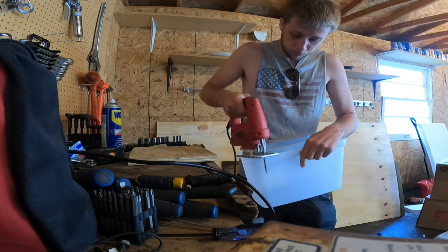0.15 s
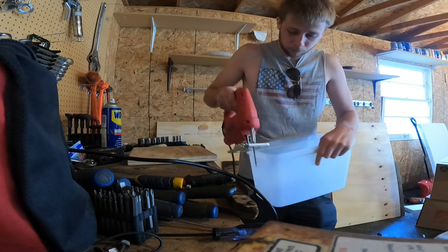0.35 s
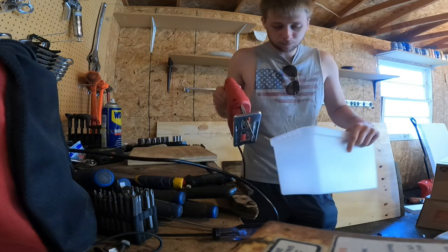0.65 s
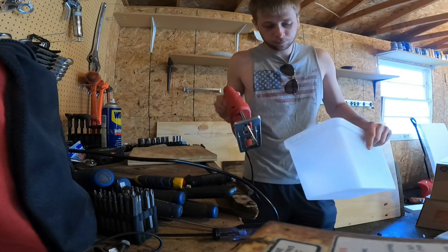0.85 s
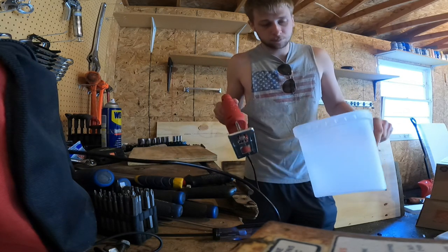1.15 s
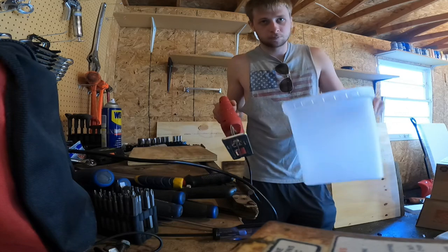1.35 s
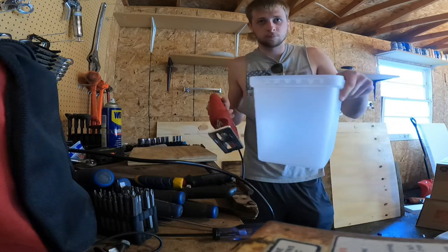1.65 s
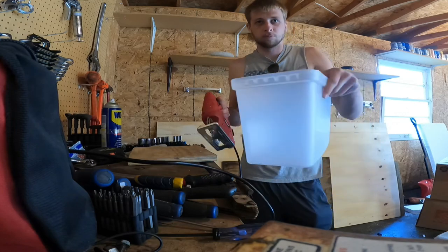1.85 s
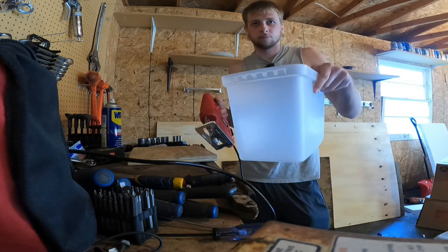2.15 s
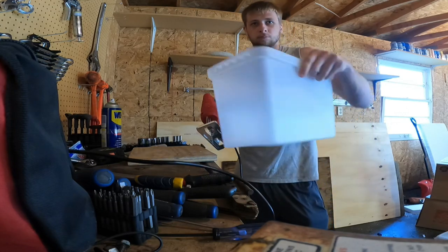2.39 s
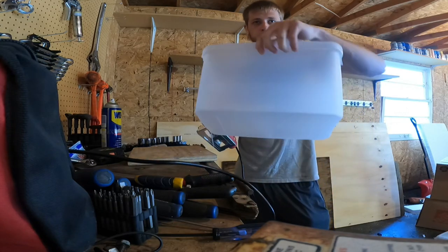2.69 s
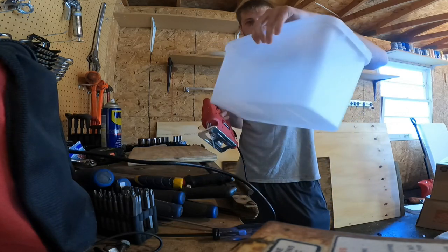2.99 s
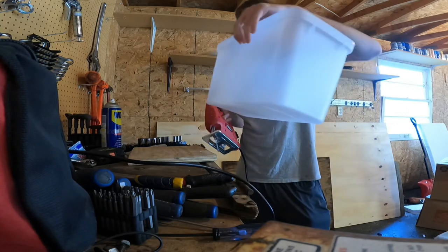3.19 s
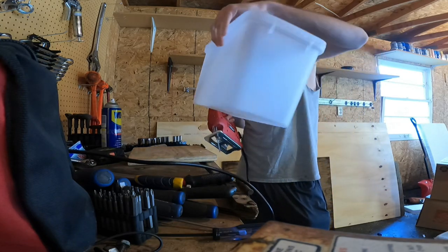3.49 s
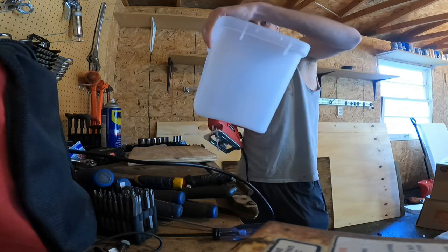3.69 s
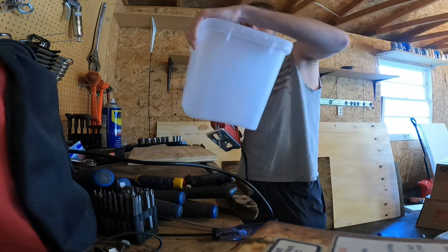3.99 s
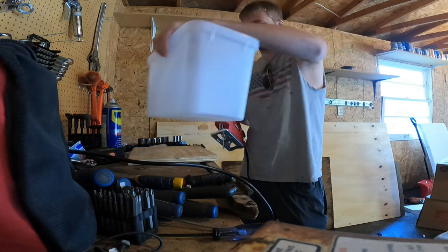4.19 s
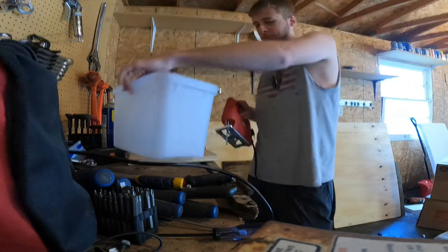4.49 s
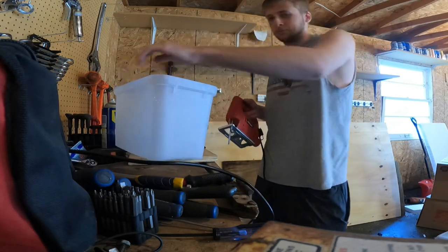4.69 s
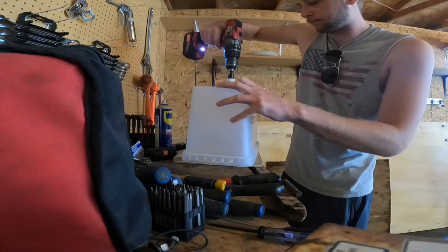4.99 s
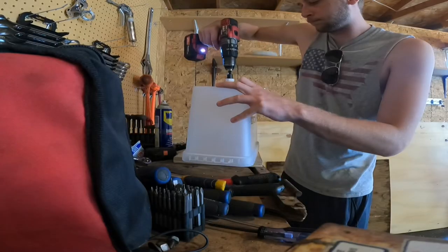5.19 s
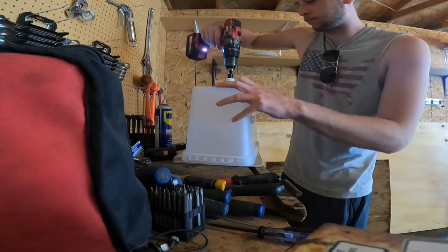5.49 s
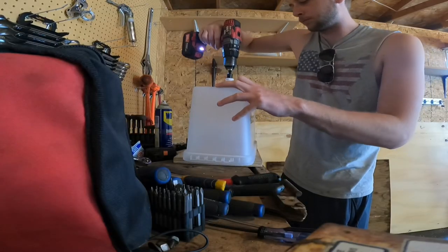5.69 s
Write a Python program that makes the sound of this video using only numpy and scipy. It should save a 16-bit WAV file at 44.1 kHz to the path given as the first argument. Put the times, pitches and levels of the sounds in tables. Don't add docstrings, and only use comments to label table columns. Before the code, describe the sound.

In a wooden shed, a power saw coasts down, clattering; a hollow plastic tub is handled and banged down, then a drill chirps briefly.

```python
import sys
import numpy as np
from scipy import signal
from scipy.fft import rfft, irfft, next_fast_len
from scipy.io import wavfile

SR = 44100
rng = np.random.default_rng(int(sys.argv[2]) if len(sys.argv) > 2 else 0)


def log_audio(samples):
    frames = np.atleast_2d(samples).T
    limited = np.clip(frames, -1, 1)
    pcm = np.round(limited * 32767).astype(np.int16)
    wavfile.write(sys.argv[1], SR, pcm)


def ratio_of_db(decibels):
    return 10 ** (np.asarray(decibels, float) / 20)


N = 257984
T = np.arange(N) / SR
STOP_S = 2.109
CHANGE_S = (4.733, 4.773)

# (frequency [Hz], level per Hz [dB])
RATTLE_FAST = [(120, -68.5), (200, -21), (227, -36), (302, -15), (607, -12), (782, -5.5), (851, -7.5),
               (926, -2.5), (1230, -4.5), (1590, -3.5), (2070, -10), (2500, -16.5), (3250, -22.5),
               (5500, -120)]
RATTLE_SLOW = [(120, -54.5), (200, -32), (322, -27), (361, -17), (402, -13), (442, -12.5), (816, -11),
               (966, -5), (1100, -6.5), (1430, 4), (2050, -7), (2500, -12), (3250, -38), (5500, -120)]
# (frequency [Hz], level per Hz [dB])
HISS_FAST = [(1240, -25.5), (2100, -8), (2660, -9), (2990, -2.5), (3700, -5), (4570, -4), (6110, -9),
             (7620, -13), (10900, -22), (12100, -20.5), (13700, -34.5)]
HISS_SLOW = [(1240, -43), (2100, -22.5), (2200, -14.5), (2760, 1.5), (2990, 3), (4030, 1), (4750, 0.5),
             (6720, -2.5), (7620, -6), (13700, -18)]
# (frequency [Hz], width [Hz], level fast [dB], level slow [dB])
PANELS = [(1557, 150, -22.5, -13), (4450, 360, -10.5, -24), (974, 170, -13.5, -13), (1290, 270, -6, -21.5)]
# (multiple of the whine [1], level [dB])
WHINE_OVERTONES = [(1, 0), (2, -8.5), (3, -8), (4, -14), (5, -8), (6, -15), (8, -18)]
# (frequency [Hz], width [Hz], level [dB])
HOUSING = [(4780, 330, 5.5), (4300, 220, -1), (5650, 130, 2), (8500, 200, -2), (7550, 600, -3),
           (6600, 700, -10), (2900, 400, -8)]
SHAFT_ORDERS = [1, 2, 3, 5, 7.5, 12.5, 15, 17.5, 20, 22.5]
SHAFT_LEVELS = [-40, -35, -34, -31, -36, -32, -32, -34, -34, -34]
# (first knock [s], number of knocks [1])
SLACK = [
    (.7541, 13),
    (1.0932, 6),
    (1.5449, 2),
    (1.4640, 3),
    (.768, 6),
]
# (peak level [dB], frequency [Hz], top edge level [dB])
SLACK_SOUND = [(-7, 3100, -17), (-12, 4500, -5), (-13, 4400, -11), (-14, 3800, -12), (-15.5, 4200, -9)]
# (time [s], peak level [dB], frequency [Hz], top edge level [dB])
STRAYS = [(0.089, -24.5, 3850, -6), (.198, -10.5, 4450, -13), (.292, -11, 4340, -6), (.341, -8, 4170, -10),
          (.367, -10, 4300, -9), (.474, -13, 3500, -9), (.495, -14.5, 4000, -6.5), (.4185, -9, 4270, -8),
          (.532, -12.5, 4680, -5.5), (.593, -12, 2830, -13), (0.627, -8.5, 2910, -5),
          (.6605, -11, 2690, -9.5), (.717, -13.5, 3470, -11.5), (.73, -12, 2900, -16.5),
          (.946, -19.5, 4150, -11), (1.308, -21, 2950, -10.5), (1.3215, -12, 3080, -11),
          (1.271, -14.5, 4000, -7.5), (1.5625, -16, 3000, -9), (1.4355, -13.5, 2970, -22),
          (1.453, -17, 3530, -8.5), (1.5243, -31, 3490, -9), (1.601, -19, 3010, -7),
          (1.6305, -12.5, 3580, -26), (1.6935, -15, 3000, -6), (1.727, -20, 5160, -1),
          (1.7995, -18, 3500, -2), (1.836, -34, 2900, -16), (1.854, -20, 2900, -4),
          (1.8955, -17.5, 3734, -6), (2.047, -48, 3750, -5), (2.0705, -29.5, 3500, 3),
          (2.1415, -44, 2620, -5)]
# (time [s], wall level [dB], wall frequency [Hz])
SNAGS = [(0, 0.5, 329), (.02, -.5, 355), (0.039, -10, 370), (.07, -2.5, 383), (.092, 1.5, 321),
         (0.129, -11.5, 295), (0.199, -19, 308), (.225, -17.5, 323), (.265, -23, 400), (.305, -24, 443),
         (0.361, -28, 322)]
# (start [s], level [dB], length [s], rise [s])
JOLTS = [
    (0, -3, .09, 0.038),
    (0.094, -4.5, .08, 0.006),
]
# (time [s], air level [dB], air frequency [Hz], wall level [dB], wall frequency [Hz])
THUMPS = [(2.531, -34, 110, -33, 351), (2.592, -32.5, 110.7, -28.5, 357), (2.694, -1.5, 87, -6, 396),
          (2.701, -5.5, 130.3, -8, 186.6), (2.745, -25.5, 120, -29.5, 409), (4.5145, -7, 118, -0.5, 265),
          (4.515, 0, 197.6, -8, 575.5), (4.514, -24.5, 160, -14, 1060), (4.528, -10.5, 61, -6.5, 388.4),
          (4.56, -3, 122.2, -10, 328), (4.604, -8.5, 116.6, -14, 395), (4.651, -14, 111.8, -22.5, 302),
          (4.987, -10.5, 143.5, -20.5, 225), (5.02, -23.5, 200, -12.5, 295.7),
          (5.045, -18, 59.9, -17.5, 311.8), (5.082, -19, 41.2, -23, 104.5), (5.148, -19, 35.95, -29, 118.5),
          (5.36, -21.5, 99.5, -26, 273), (5.391, -33, 199.3, -22.5, 253), (5.419, -34.5, 188, -25.5, 293.3),
          (5.816, -7, 150, -11.5, 226.6)]
# (time [s], peak level [dB], frequency [Hz], edge level [dB], time to fall 60 dB [s])
CRACKS = [(2.6925, -12, 1245, -3, 0.15), (2.6945, -10, 1530, -20, 0.033), (2.704, -21, 1580, -10.5, 0.051),
          (4.29, -43, 1720, -6, 0.062), (4.5128, 3.5, 1102, -28.5, 0.14), (4.541, -23, 1010, -11.5, 1),
          (4.576, -20, 1150, -20, 0.55), (4.605, -20, 910, -34.5, 0.17), (4.631, -21.5, 1030, -28, 0.27),
          (4.656, -33, 1065, -29, 0.22), (4.982, -20.5, 940, -6, 0.36), (5.017, -33, 1060, 2, 0.22),
          (5.037, -13.5, 1820, -15.5, 0.023), (5.48, -34.5, 1830, -12, .1),
          (5.484, -20.5, 1830, -19.5, 0.13), (5.486, -35, 960, -6, 0.099), (5.815, -27.5, 1480, -18, 0.19),
          (5.821, -14.5, 1820, -27, 0.47)]
# (frequency [Hz], level per Hz [dB])
CRACK_BODY = [(240, -42.5), (400, 4), (433, -8.5), (554, -6), (674, -6), (719, -9), (819, -16.5),
              (1040, 1.5), (1120, -9.5), (1550, -7.5), (2820, -23.5), (9000, -74.5), (11700, -77),
              (19800, -120)]
# (frequency [Hz], level per Hz [dB])
BRIGHT_EDGE = [(1500, -28.5), (2800, 1.5), (5000, -4), (8000, -13), (11000, -22.5), (14000, -28.5)]
# (time [s], level [dB], time to fall 60 dB [s])
SHUDDERS = [
    (2.696, -21.5, 0.23),
    (4.52, -12, 0.36),
    (4.6, -20.5, .4),
    (4.99, -23, 0.22),
    (.1, -21, .6),
]
# (frequency [Hz], level per Hz [dB])
BOARDS = [(40, -20), (70, -2), (130, 1.5), (270, -2), (400, -3.5), (480, -12.5), (1200, -29.5),
          (4000, -110)]
# (centre [s], half length [s], dull level [dB], bright level [dB])
SCUFFS = [(2.102, 0.057, -59.5, -53.5), (2.492, 0.051, -79, -57), (2.538, 0.022, -38.5, -47),
          (2.597, 0.023, -38, -57), (2.647, 0.1, -60, -59.5), (2.759, 0.048, -44, -52.5),
          (2.864, 0.057, -47.5, -57), (3.13, 0.061, -71, -70), (3.766, 0.045, -70.5, -75),
          (3.908, 0.074, -63, -88.5), (4.038, 0.068, -65, -75), (3.663, 0.049, -73, -93.5),
          (5.282, .03, -73, -76), (4.146, 0.033, -62, -64), (4.23, 0.016, -65, -67), (4.29, .014, -64, -56),
          (4.305, 0.074, -59.5, -58), (4.424, 0.1, -49, -49), (4.51, 0.0093, -29.5, -57),
          (4.976, 0.065, -48, -53), (5, 0.021, -32.5, -57), (5.053, 0.13, -54, -66.5),
          (5.395, 0.0037, -57, -60), (5.426, 0.01, -45.5, -68), (5.833, 0.016, -57, -59.5),
          (5.648, 0.26, -54.5, -63.5)]
# (frequency [Hz], level per Hz [dB])
RUB_DULL = [(260, -15.5), (450, -3), (478, -14), (564, -11), (621, -13.5), (1060, -9), (1500, -12.5),
            (1960, -16.5), (2560, -26.5), (2900, -28.5), (3600, -68), (4680, -98), (7920, -120)]
RUB_BRIGHT = [(1470, -12), (2500, -0.5), (3300, -5.5), (3900, -6.5), (5300, -5), (8340, -12), (12300, -21),
              (13700, -29.5)]
# (frequency [Hz], level per Hz [dB])
RUMBLE_COLOUR = [(8.8, -49), (15, -12), (48, 6), (76, 3), (134, 2), (162, -2.5), (273, -9), (314, -10.5),
                 (378, -14), (441, -20), (483, -34.5), (564, -31), (600, -38.5), (780, -65), (1320, -120)]
# (start [s], length [s], start frequency [Hz], end frequency [Hz], level [dB])
FAR_TONES = [(0.62, 0.19, 906, 895, -26.5), (.11, 0.2, 805, 800, -26), (1.425, 0.03, 1440, 1440, -24),
             (1.62, .04, 1420, 1400, -29), (1.91, .05, 1500, 1480, -36), (1.496, 0.039, 1560, 1550, -24),
             (1.75, 0.058, 1450, 1440, -30), (1.835, 0.05, 1480, 1490, -31), (1.528, .016, 7900, 7600, -35),
             (1.772, .024, 4560, 4440, -34), (2.85, 0.7, 128.2, 129.5, -37), (3.11, 0.57, 370, 372, -49.5),
             (4.202, 0.39, 214.8, 217.6, -39.5), (3.441, 0.12, 2860, 2850, -63),
             (3.75, 0.24, 2350, 2320, -62.5), (3.19, 0.11, 2360, 2410, -68), (3.85, .1, 3380, 3400, -69),
             (3.8, .12, 2750, 2800, -69), (4.937, .025, 8800, 8800, -52), (5.08, .18, 4700, 4600, -72),
             (5.51, 0.06, 6750, 7100, -69), (5.535, .045, 7300, 7500, -69), (5.615, .03, 7150, 7400, -67),
             (5.625, 0.055, 7800, 7950, -56), (5.665, .075, 7950, 7880, -63), (4.985, .04, 7100, 7000, -62),
             (4.975, .03, 6300, 6200, -58)]
# (frequency [Hz], time to fall 60 dB [s])
SHED_DECAY = [(100, 0.5), (500, 0.37), (2000, 0.24), (8000, 0.31)]
# (frequency [Hz], level [dB])
ROOM_SHARE = [(60, -20), (300, -3.5), (1000, -9.5), (8000, -15)]
# (frequency [Hz], likeness [0 to 1])
LIKENESS = [(30, 0.99), (110, 1), (200, 0.99), (360, 0.98), (660, 0.92), (1200, 0.96), (2200, 0.78),
            (4000, 0.92), (7290, 0.94), (13300, 0.75)]
# (frequency [Hz], level difference [dB])
TILT = [(60, .2), (150, .4), (360, 0.1), (890, -0.57), (2200, 0.23), (5400, -0.8), (13300, 0.0)]
# (frequency [Hz], level [dB])
MIC = [(8, -30), (25, -1), (40, 0), (7500, 0), (8200, -5), (9600, -3.5), (13100, -5), (13900, -16),
       (16000, -28)]


def evened(x):
    return x / np.sqrt(np.mean(x ** 2) + 1e-20)


def read(points, hz):
    f, value = np.transpose(points)
    return np.interp(np.log(hz + 1), np.log(f + 1), value)


def add(mix, s, sound):
    part = mix[round(s * SR):][:len(sound)]
    part += sound[:len(part)]


def colour(x, points):
    size = next_fast_len(N)
    gain = ratio_of_db(read(points, np.fft.rfftfreq(size, 1 / SR)))
    return evened(irfft(rfft(x, size) * gain, size)[:N])


def noise():
    return rng.standard_normal(N)


def drift(per_s):
    knots = rng.standard_normal(3000)
    return np.interp(T * per_s, np.arange(3000), knots) * 1.2


def grains(per_s, spread_db, hiss):
    sizes = ratio_of_db(spread_db * np.minimum(rng.exponential(1, N), 4))
    ticks = (rng.random(N) < per_s / SR) * sizes
    return evened(ticks * noise()) + hiss * noise()


def ring(hz, t60, rise=0.000044):
    t = np.arange(int(np.clip(1.5 * t60, .001, 1) * SR)) / SR
    return np.sin(2 * np.pi * hz * t) * ratio_of_db(-60 * t / t60) * (1 - np.exp(-t / rise))


def glide(hz):
    return np.sin(2 * np.pi * np.cumsum(hz) / SR)


def shed(x):
    length = SR // 2
    echoes = rng.random((2, length)) < .06
    taps = rng.choice([-1., 1.], (2, length)) * echoes * (np.arange(length) > 150)
    hz, t, z = signal.stft(taps, SR, nperseg=256)
    tail = signal.istft(z * ratio_of_db(-60 * t / read(SHED_DECAY, hz)[:, None]), SR, nperseg=256)[1]
    return signal.fftconvolve(x[None], tail / np.linalg.norm(tail[0]), axes=1)[:, :N]


def rumble():
    level_db, gust_db, gust_s = -35, 5, 5.45
    out = colour(noise(), RUMBLE_COLOUR) * ratio_of_db(level_db + 0.5 * drift(27))
    swell_db = np.interp(T, (1.2, 2.54), (-12, 0))
    swell_db = swell_db - 2.5 * (T > CHANGE_S[0])
    out *= ratio_of_db(swell_db + gust_db * np.exp(-((T - gust_s) / 0.12) ** 2))
    for s, length, start_hz, end_hz, db in FAR_TONES:
        hz = np.linspace(start_hz, end_hz, round(length * SR))
        hz = hz * (1 + 0.007 * drift(400)[:len(hz)])
        waver = ratio_of_db(db + 2.5 * drift(30)[:len(hz)]) * signal.windows.tukey(len(hz), .5)
        add(out, s, waver * glide(hz))
    return out


def handling():
    from_s, rise_s = 2.056, 0.044
    dull, bright = ratio_of_db(-52.5), ratio_of_db(-70)
    for s, half, dull_db, bright_db in SCUFFS:
        swell = np.exp(-((T - s) / half) ** 2)
        dull = dull + ratio_of_db(dull_db) * swell
        bright = bright + ratio_of_db(bright_db) * swell
    dull = dull * colour(grains(650, spread_db=-3.0, hiss=1.8), RUB_DULL) * ratio_of_db(0.93 * drift(30))
    bright = bright * colour(grains(660, spread_db=-4.5, hiss=2.3), RUB_BRIGHT) * ratio_of_db(0.93 * drift(40))
    return (dull + bright) * np.clip((T - from_s) / rise_s, 0, 1)


def bench():
    land_s, thud_db, thud_t60 = 4.5145, -2.5, 0.13
    start_hz, end_hz, sag_s = 339.6, 105, .011
    shake = 0
    for s, db, t60 in SHUDDERS:
        rise = np.clip((T - s) / 0.0038, 0, 1)
        shake = shake + ratio_of_db(db - 60 * np.maximum(T - s, 0) / t60) * rise
    out = shake * colour(noise(), BOARDS)
    t = np.arange(SR // 4) / SR
    hz = end_hz + (start_hz - end_hz) * np.exp(-t / sag_s)
    add(out, land_s, ratio_of_db(thud_db - 60 * t / thud_t60) * glide(hz))
    return out


def drill():
    start_s, off_s, end_s = 4.903, 5.0, 5.14
    pitch_hz, sag_hz = 4150, 40
    rise = np.clip((T - start_s) / (off_s - start_s), 0, 1)
    after = np.maximum(T - off_s, 0)
    hz = (pitch_hz - sag_hz * rise ** 2) * (1 + .022 * drift(600))
    on = np.clip((T - start_s) / 0.011, 0, 1) * (T < end_s)
    on = on * ratio_of_db(-12 * np.minimum(after / 0.011, 1))
    tone = ratio_of_db(-45.5 + 9 * rise ** 0.66 - 60 * after / .4 + 2 * drift(150)) * glide(hz)
    octave = ratio_of_db(-45.5 - 60 * after / 0.26 + 4.6 * drift(120)) * glide(2 * hz)
    return on * (tone + octave)


def wall(db, hz, t60):
    main = ring(hz, 0.5 * t60, 0.0022)
    lower = .5 * ring(hz * .84, 0.5 * t60, 0.001)
    upper = 0.13 * ring(hz * 1.17, 0.5 * t60, 0.0014)
    return ratio_of_db(db) * (main + lower + upper)


def bin_shake():
    air_hz, left_db, left_t60 = 119.1, -32, 1
    shake = ratio_of_db(left_db - 60 * (T - .19) / left_t60 + 1.8 * drift(33)) * (T > JOLTS[-1][0])
    for s, db, length, rise in JOLTS:
        head_start = 0.16 * (s == 0)
        fade = ratio_of_db(db - 24 * ((T - s) / length) ** 2)
        shake = shake + fade * np.clip((T - s) / rise + head_start, 0, 1)
    out = shake * glide(air_hz * (1 + 0.02 * drift(30)))
    for s, db, hz in SNAGS:
        add(out, s, wall(db, hz, t60=0.13))
    return out


def bin_cracks():
    out = np.zeros(N)
    body, edge = colour(noise(), CRACK_BODY), colour(noise(), BRIGHT_EDGE)
    t = np.arange(SR // 2) / SR
    for s, db, hz, edge_db, t60 in CRACKS:
        at = round(s * SR)
        fall = ratio_of_db(-60 * t / .025) + .35 * ratio_of_db(-60 * t / t60)
        shape = (fall * (1 - np.exp(-t / .0005)))[:N - at]
        add(out, s, ratio_of_db(db - 8.0) * shape * (body[at:][:len(t)] + ratio_of_db(edge_db) * edge[at:][:len(t)]))
        add(out, s, ratio_of_db(db - 5) * ring(hz, .03, .0004))
        add(out, s, ratio_of_db(1.4 * db - 14) * ring(4000, 0.0016, .00003))
    return out


def bin_knocks():
    out = bin_shake() + bin_cracks()
    for s, air_db, air_hz, wall_db, wall_hz in THUMPS:
        air_t60 = 0.1 * max(120 / air_hz, 1) ** 1.2
        wall_t60 = 0.084 - 0.008 * wall_db
        add(out, s, ratio_of_db(air_db) * ring(air_hz, air_t60, 0.00068))
        add(out, s, wall(wall_db, wall_hz, wall_t60))
    return out


def coasting():
    friction_hz_per_s, drag_hz, drag_power = 4070, 212, 4
    left = np.maximum(STOP_S - T, 0)
    hz = friction_hz_per_s * left + drag_hz * left ** drag_power
    return hz + 180 * np.exp(-((T - 1.9) / .15) ** 2)


def gear_rattle(hz):
    fast = np.clip((hz - 2500) / 5000, 0, 1)
    smooth = 4.5 + (2.2 - 4.5) * np.clip((hz - 5000) / 3000, 0, 1)
    teeth = grains(150 + .4 * hz, spread_db=1.4, hiss=smooth)
    teeth = teeth / np.sqrt(1 + smooth ** 2) * 2.4 * ratio_of_db(1.1 * drift(120))
    roar = teeth + 3 * noise()
    rattle = evened(fast * colour(roar, RATTLE_FAST) + (1 - fast) * colour(roar, RATTLE_SLOW))
    for f, width, fast_db, slow_db in PANELS:
        panel = evened(signal.lfilter(*signal.iirpeak(f, f / width, SR), teeth))
        panel_db = slow_db + (fast_db - slow_db) * hz / hz[0]
        rattle = rattle + ratio_of_db(panel_db + 2.5 * drift(35.33)) * panel
    hiss = evened(fast * colour(teeth, HISS_FAST) + (1 - fast) * colour(teeth, HISS_SLOW))
    run = hz + 120
    out = ratio_of_db(-18) * (run / (run + 2615)) ** 1.56 * rattle
    out = out + ratio_of_db(-17.5) * (run / (run + 3500)) ** 1.58 * hiss
    load_db = -2 * np.exp(-(T / 0.14) ** 2)
    return out * ratio_of_db(load_db - 110 * np.maximum(T - STOP_S, 0))


def whine(hz):
    cycles_per_turn, low_hz, high_hz = 24, 420, 3200
    end = round(STOP_S * SR)
    hz, out = hz[:end], np.zeros(N)
    turns = np.cumsum(hz * (1 + .006 * drift(300)[:end])) / SR
    for k, db in WHINE_OVERTONES:
        lift = sum(ratio_of_db(d) / (1 + ((k * hz - f) / w) ** 2) ** 1.2 for f, w, d in HOUSING)
        out[:end] += ratio_of_db(db + 1.5 * drift(70)[:end]) * lift * np.sin(2 * np.pi * k * turns)
    out[:end] *= ratio_of_db(-31.5) * np.minimum(hz / 1200, 1) ** 2
    for k, db in zip(SHAFT_ORDERS, SHAFT_LEVELS):
        f = k * hz / cycles_per_turn
        band = 1 / (1 + (low_hz / f) ** 2) / (1 + (f / high_hz) ** 4)
        level = ratio_of_db(db + 6.4 * drift(12)[:end]) * band * hz / hz[0]
        out[:end] += level * np.sin(2 * np.pi * k * turns / cycles_per_turn)
    return out


def holder_knocks(hz):
    whine_per_stroke, full_hz, uneven_db = 231.2, 3500, .8
    strokes = np.cumsum(hz + 1e-6) / SR / whine_per_stroke
    knocks = list(STRAYS)
    for (first, count), (db, f, edge_db) in zip(SLACK, SLACK_SOUND):
        places = np.interp(first, T, strokes) + np.arange(count)
        for s in np.interp(places, strokes, T):
            weak_db = 20 * np.log10(min(np.interp(s, T, hz) / full_hz, 1))
            knocks.append((s, db + weak_db + uneven_db * rng.standard_normal(), f, edge_db))
    holder = [.3 * ring(2950, 0.015), .3 * ring(3620, 0.022), .05 * ring(1800, 0.0067)]
    blade = [1.05 * ring(6200, 0.0032), 0.87 * ring(5600, 0.005), .4 * ring(7100, 0.005),
             0.36 * ring(10500, .003), .4 * ring(12500, .003)]
    buzz = colour(noise(), BRIGHT_EDGE)
    tail = ratio_of_db(-12 - 60 * np.arange(900) / SR / 0.022)
    t = np.arange(-40, 40) / SR
    out = np.zeros(N)
    for s, db, f, edge_db in knocks:
        add(out, s, ratio_of_db(db) * tail * buzz[round(s * SR):][:900])
        tick = np.exp(-(t / 0.00035) ** 2) * np.sin(2 * np.pi * (1600 + .5 * f) * t)
        add(out, s - .0006, ratio_of_db(db) * tick)
        for mode in holder:
            add(out, s, ratio_of_db(db) * mode)
        for mode in blade:
            add(out, s, ratio_of_db(db + edge_db) * mode)
    return out


def saw():
    hz = coasting()
    return gear_rattle(hz) + whine(hz) + holder_knocks(hz)


def scene():
    near = rumble() + handling() + bench() + drill() + bin_knocks() + saw()
    hz, before = np.fft.rfftfreq(N, 1 / SR), T < CHANGE_S[1]
    room = shed(near * before) * before + shed(near * ~before)
    direct = rfft(near)
    shared, unlike = rfft(room)
    unlike = unlike + .25 * direct * np.exp(-hz / 100) * 1j
    early = rng.standard_normal(300) / np.sqrt(300)
    unlike = unlike + .5 * rfft(early, N) * direct
    apart = np.sqrt(np.clip(1 - read(LIKENESS, hz), 0, 1))
    mid = direct + ratio_of_db(read(ROOM_SHARE, hz)) * shared
    lean = ratio_of_db(read(TILT, hz) / 2)
    return irfft(np.array([(mid + apart * unlike) * lean, (mid - apart * unlike) / lean]), N)


def band_limit(x):
    return signal.sosfilt(signal.butter(12, 15700, fs=SR, output="sos"), x)


def record(dry):
    heard = irfft(rfft(dry) * ratio_of_db(read(MIC, np.fft.rfftfreq(N, 1 / SR))), N)
    kept = np.clip(np.maximum(CHANGE_S[0] - T, T - CHANGE_S[1]) / .003, 0, 1)
    kept = kept * np.clip((T[-1] - T) / .004, 0, 1)
    return band_limit(np.clip(heard * kept, -1, 1))


dry = scene()
out = record(dry)
log_audio(out)
```